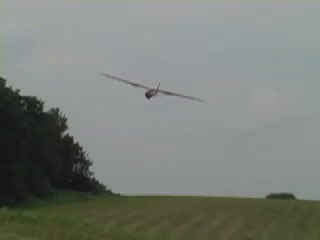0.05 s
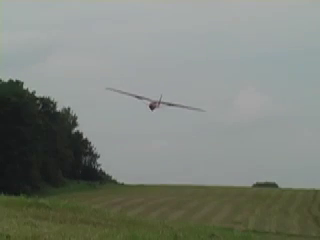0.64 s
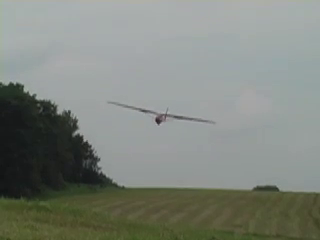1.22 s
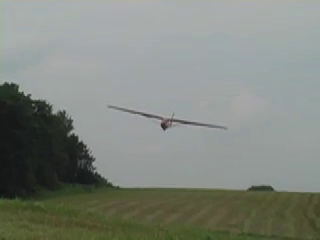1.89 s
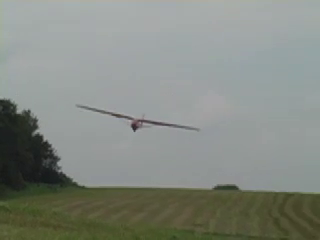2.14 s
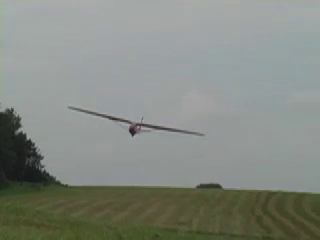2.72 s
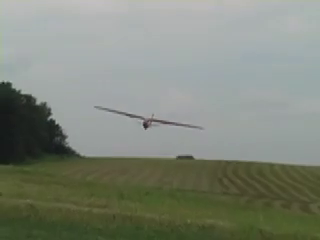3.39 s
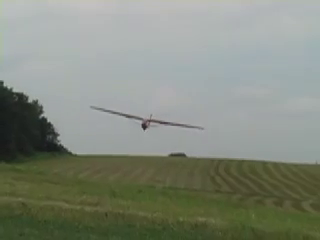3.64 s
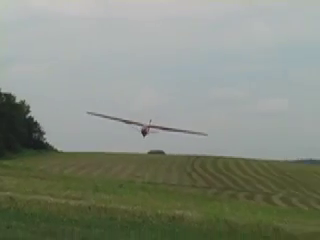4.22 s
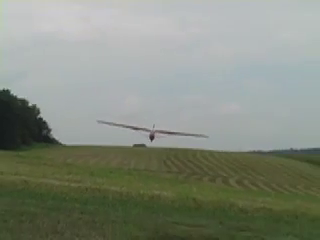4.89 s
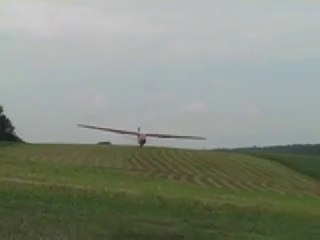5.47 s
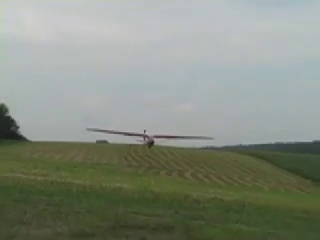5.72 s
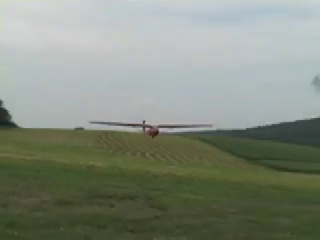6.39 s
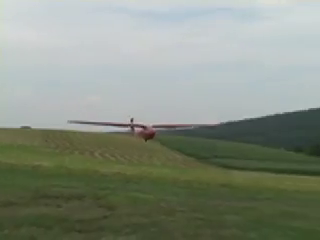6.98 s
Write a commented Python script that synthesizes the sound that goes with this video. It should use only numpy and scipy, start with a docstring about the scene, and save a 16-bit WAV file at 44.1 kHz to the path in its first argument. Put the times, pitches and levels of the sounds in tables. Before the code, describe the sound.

A glider's soft rush of air slowly grows over a distant engine's low hum, with breeze, a songbird and faint crickets.

```python
"""From the start, air rushes over the wings and struts of a low glider approaching a hand-held camcorder across
a mown field; a breeze blows, bush crickets rasp and a distant three-cylinder engine idles. From 0.3 s to 3.7 s
a songbird whistles paired notes in the trees on the right, while gusts buffet the microphone and the camera
takes two knocks, the first a hard one. At 4.3 s the engine picks up a little. Two more knocks follow near 6 s,
and the glider's rush ends louder and brighter than it began."""
import sys
import numpy as np
from scipy import signal
from scipy.fft import rfft, irfft
from scipy.io import wavfile
from scipy.ndimage import uniform_filter1d

SR = 44100
rng = np.random.default_rng(int(sys.argv[2]) if len(sys.argv) > 2 else 0)


def log_audio(samples):
    """Write samples as a 16-bit WAV file to the path given in sys.argv[1]."""
    # one column per channel
    frames = np.atleast_2d(samples).T
    # limit to full scale, then quantise
    limited = np.clip(frames, -1, 1)
    pcm = np.round(limited * 32767).astype(np.int16)
    wavfile.write(sys.argv[1], SR, pcm)


N = 308700
TIME = np.arange(N) / SR

# whine of the tape drive: (harmonic of the drum rate [1], rms level [dB])
DRUM_HARMONICS = [(16, -82), (17, -79.5), (18, -82), (19, -81), (34, -94), (36, -93), (37, -93), (38, -94)]

# spectra of the wind over the field, its hiss and the trees: (frequency [Hz], density level [dB])
WIND_SPECTRUM = [(30, -23), (200, -5.5), (450, 0.5), (800, -0.5), (1300, -7.5), (2000, -10.5),
                 (3200, -10.5), (5200, -9), (6600, -15), (9500, -18.5), (12000, -18.5), (15000, -23)]
HISS_SPECTRUM = [(1500, -20), (4000, -3), (8000, 1), (12000, -4), (15000, -22)]
TREE_SPECTRUM = [(300, -7), (550, 9), (800, -2), (1200, 4), (1800, -18)]
# swells of hiss, soughs in the trees and gusts on the microphone: (time [s], width [s], level [dB])
HISS_SWELLS = [(5.05, 0.11, -56.5), (5.16, .09, -56.8), (5.335, .11, -57.5)]
TREE_SWELLS = [(1.6, 1, -64), (6.85, 0.64, -59)]
GUST_SWELLS = [(.72, 0.44, -48), (1.35, 0.13, -48), (2.003, 1, -47), (2.547, 0.32, -53), (3.33, 0.39, -41)]
# spectra of gusts, grip, casing clicks and grass ticks: (frequency [Hz], density level [dB])
GUST_SPECTRUM = [(25, -51), (50, 1), (80, 5.5), (110, .5), (160, -22.5), (240, -15), (500, -65)]
GRIP_SPECTRUM = [(120, -22), (300, 4), (450, 8.5), (600, -2.5), (820, 0), (1300, -10.5), (3000, -30)]
CLICK_SPECTRUM = [(1000, -14), (3000, -6), (6000, 11), (10000, 6), (15000, -13)]
TICK_SPECTRUM = [(7000, -24), (9500, 10), (11000, -7), (14000, -20)]

# shifts of the hand on the grip: (time [s], width [s], level [dB])
GRIP_SWELLS = [(2.3, 0.065, -49), (3.39, 0.12, -53), (3.7, 0.35, -62), (4.45, 1, -61.5), (5.3, 0.28, -58.5),
               (5.87, 0.052, -52), (6.285, 0.088, -53), (6.95, 0.23, -57)]
# clicks of the casing and ticks in the grass: (time [s], t60 [s], level [dB])
CLICK_BURSTS = [(.348, .02, -58), (4.645, .02, -48.5), (4.656, .015, -50), (5.852, .012, -54),
                (6.26, .022, -48)]
TICK_BURSTS = [(1.361, .04, -61), (1.612, .04, -59), (1.824, .04, -65), (1.949, .04, -61),
               (2.072, .04, -63), (2.248, .03, -63), (2.46, .03, -65), (3.447, 0.033, -63)]
# knocks on the camera: (time [s], gain [dB], contact time [s])
IMPACTS = [(0.3491, -29, 0.0019), (3.412, -33.5, 0.004), (5.853, -35.5, 0.0025), (6.262, -38, 0.0027)]
# normal modes of the casing: (frequency [Hz], relative level [dB], t60 [s])
CASING_MODES = [(359, 0.5, 0.054), (445, 1, 0.031), (673, -2, 0.031), (770, -3.5, 0.041), (1850, -9, 0.016),
                (2300, 0, 0.0066), (2830, 1, 0.0073)]

# chorus of far crickets: (frequency [Hz], density level [dB])
CHORUS_SPECTRUM = [(6500, -34), (7300, -8.5), (7800, -3.5), (8200, -3.5), (8500, -6.5), (9200, -24)]
# near crickets: (stroke rate [Hz], sounding share of the cycle [1], crest pitch [Hz], pitch fall [Hz],
# rasp width [Hz], gain [dB], left minus right [dB])
NEAR_CRICKETS = [(21.3, .72, 8300, 550, 170, -68.3, -3), (20.0, .72, 8020, 900, 260, -67.3, 0),
                 (11.4, .25, 8100, 1150, 150, -66.5, -1)]

# notes of each named bird syllable:
# (offset [s], length [s], first pitch [Hz], middle pitch [Hz], last pitch [Hz], relative level [dB])
SYLLABLE_NOTES = { "slur": [(.015, .035, 4000, 3550, 3100, -8), (.06, .035, 6000, 6100, 6300, -2),
                  (.132, .05, 4750, 5100, 5150, 1), (.205, .066, 4000, 3770, 3750, -1)],
                  "dip": [(0, .032, 6800, 6150, 5800, -1), (.03, .036, 5800, 6080, 6080, -.5)],
                  "scoop": [(0, .05, 5200, 4350, 3950, 0)],
                  "twitter": [(.029 * k, .029, 3500, 5400, 3700, 0) for k in range(4)],
                  "fall": [(.005, .028, 3550, 3400, 3050, -5), (.066, .04, 3900, 4080, 4250, -2.5),
                  (.114, .074, 6500, 6100, 5050, .5)], "flick": [(0, .03, 5050, 4870, 4800, 0)],
                  "sweep": [(0, .062, 6800, 4350, 3100, -2), (.078, .022, 3200, 4100, 5100, -13),
                  (.1, .078, 5150, 5720, 5600, .5)], "seesaw": [(0, .044, 5050, 4780, 4700, -1),
                  (.05, .022, 5000, 6300, 7400, -6), (.125, .063, 3130, 3460, 3500, 1)],
                  "arch": [(.004, .036, 3300, 4450, 5900, -.5), (.038, .03, 5850, 6250, 5700, -1),
                  (.066, .03, 5300, 3900, 3200, -4.5)], "sigh": [(0, .095, 4400, 4030, 3450, 0)]}
# the song: (time [s], syllable [name], level [dB])
BIRD_SONG = [(.3, "slur", -61), (.676, "dip", -60.5), (.745, "twitter", -63), (.945, "scoop", -60),
             (.96, "dip", -55), (1.032, "twitter", -61.5), (1.242, "fall", -56), (1.425, "flick", -58),
             (1.532, "fall", -56.5), (1.708, "flick", -63), (1.875, "sweep", -52.5),
             (2.174, "sweep", -54.5), (2.488, "seesaw", -56), (2.788, "seesaw", -55.5),
             (3.138, "arch", -55.5), (3.324, "arch", -58.5), (3.595, "sigh", -62.5)]

# exhaust note, firing on every third order: (order of the working cycle [1], relative level [dB])
EXHAUST_ORDERS = [(2, -24), (3, 0), (4, -12.3), (5, -26), (6, -5.2), (7, -26), (8, -25), (9, -20),
                  (10, -28)]
# spectra of the engine's rumble and clatter: (frequency [Hz], density level [dB])
RUMBLE_SPECTRUM = [(20, -33), (35, -25), (50, 1.5), (80, 4), (115, 2), (160, 4), (230, -7), (400, -37)]
CLATTER_SPECTRUM = [(70, -5.5), (160, 1.5), (240, 0.5), (320, -3), (450, -13), (600, -21.5), (800, -16),
                    (1300, -16.5), (2200, -25.5)]
# slow drift of the clatter: (time [s], relative level [dB])
CLATTER_LEVELS = [(0, 1.5), (.7, 0.5), (1.4, 1.5), (2.8, 0.5), (4.4, 4), (5.4, 0), (6.5, 0), (7, 1)]

# spectrum of the glider's rush: (frequency [Hz], density level [dB])
RUSH_SPECTRUM = [(200, 1.5), (450, 1), (620, -3.5), (800, 0), (1000, -1), (1300, 2.5), (1700, -2),
                 (2100, 1), (3300, 0), (4600, -3.5), (5600, -5), (7000, -9), (9500, -16.5), (15000, -34)]
# surges and lulls of the rush in uneven air: (time [s], width [s], level change [dB])
RUSH_SURGES = [(1.7, 2.2, 3.5), (4.6, 0.37, 1), (5.316, 0.57, 2.5), (6.95, 1, -1.1)]
# treble of the rush, above 1900 Hz: (time [s], gain [dB])
RUSH_TREBLE = [(1, -10.5), (3.2, -2), (5.3, 1), (6, -1.2), (7, 3)]


def undb(db):
    """Amplitude ratio of a level: tenfold for every 20 dB."""
    return 10 ** (np.asarray(db) / 20)


def bell(time, width):
    """Gaussian envelope of peak 1, its width taken between the 1/e points."""
    return np.exp(-(2 * (TIME - time) / width) ** 2)


def swells(table):
    """Superposed Gaussian envelopes, one for each row."""
    return sum(undb(db) * bell(time, width) for time, width, db in table)


def bursts(table):
    """Sudden onsets with exponential decay, falling 60 dB in t60."""
    return sum((TIME >= time) * undb(db - 60 * np.abs(TIME - time) / t60) for time, t60, db in table)


def walk(rate_hz):
    """Low-pass random fluctuation with a standard deviation near 1."""
    step = max(int(SR / rate_hz), 1)
    held = np.repeat(rng.standard_normal(N // step + 1), step)
    return 1.2 * uniform_filter1d(uniform_filter1d(held, step), step)[:N]


def pan(left_db):
    """Channel gains for a level difference, left minus right."""
    return undb(np.array([[left_db], [-left_db]]) / 2)


def noise(spectrum, correlation):
    """Spectrally shaped noise of rms 1; the mid-to-side ratio sets the correlation of the channels."""
    hz, db = np.transpose(spectrum)
    octave = np.log2(np.fft.rfftfreq(N, 1 / SR) + 1)
    roll_off_db = 30 * np.maximum(octave - np.log2(hz[-1]), 0)
    gain = undb(np.interp(octave, np.log2(hz), db) - roll_off_db)
    mid, side = irfft(rfft(rng.standard_normal((2, N))) * gain, N)
    stereo = np.sqrt(1 + correlation) * mid + np.sqrt(1 - correlation) * np.array([side, -side])
    return stereo / stereo.std()


def scatter(direct, t60, wet_db):
    """Scattering by trees and ground adds a diffuse, decaying tail, independent on each side."""
    t = TIME[:SR // 2]
    tail = rng.standard_normal((2, len(t))) * undb(-60 * t / t60)
    tail /= np.sqrt(np.sum(tail ** 2, axis=1, keepdims=True))
    return direct + undb(wet_db) * signal.fftconvolve(direct[None], tail, axes=1)[:, :N]


def tape_drive(drum_hz=299.7):
    """Periodic rotation of the head drum gives a faint, slightly wavering line spectrum."""
    angle = 2 * np.pi * np.cumsum(drum_hz + .1 * walk(8)) / SR
    return sum(np.sqrt(2) * undb(db + 2 * walk(5)) * np.sin(k * angle) for k, db in DRUM_HARMONICS)


def breeze():
    """Turbulent flow over field and trees makes broadband noise, with soughs and brief swells of hiss."""
    wind = noise(WIND_SPECTRUM, correlation=.041) * undb(-56.5 + .5 * walk(1.6) + .5 * walk(7.4))
    hiss = noise(HISS_SPECTRUM, correlation=0) * swells(HISS_SWELLS)
    trees = noise(TREE_SPECTRUM, correlation=.61) * swells(TREE_SWELLS)
    return wind * pan(.16) + hiss + trees


def buffets():
    """The eddy in each gust imposes a coherent low-frequency pressure on both microphone ports."""
    return noise(GUST_SPECTRUM, correlation=1) * swells(GUST_SWELLS) * pan(2.5)


def grip():
    """Friction of skin and strap travels through the casing as dull structure-borne sound."""
    return noise(GRIP_SPECTRUM, correlation=.38) * swells(GRIP_SWELLS) * pan(2.2)


def clicks():
    """Damped transients: the plastic casing clicks under the fingers; something ticks in the grass."""
    plastic = noise(CLICK_SPECTRUM, correlation=.5) * bursts(CLICK_BURSTS)
    grass = noise(TICK_SPECTRUM, correlation=.76) * bursts(TICK_BURSTS)
    return plastic + grass


def knocks():
    """A fingertip's impact excites the casing's damped modes, which rock the two ports out of step."""
    out, t = np.zeros((2, N)), TIME[:SR // 6]
    port_phase = np.array([[0], [-1.5]])
    ring = sum(undb(db - 60 * t / t60) * np.sin(2 * np.pi * hz * t + port_phase)
               for hz, db, t60 in CASING_MODES)
    for time, db, contact_s in IMPACTS:
        start = int(time * SR)
        attack = 1 - np.exp(-t / contact_s)  # a softer touch builds up more slowly
        out[:, start:start + len(t)] += undb(db) * ring * attack
    return out * pan(1.4)


def cricket(strokes_hz, share, crest_hz, fall_hz, width_hz, db, left_db):
    """Stridulation: each wing stroke drags a scraper over a file, then the wings reopen silently."""
    cycle = np.cumsum(strokes_hz * (1 + .035 * walk(2) + .13 * walk(20))) / SR % 1
    stroke = np.minimum(cycle / share, 1)
    crest = .35  # fraction of the stroke at which the pitch peaks
    hz = crest_hz - fall_hz * ((stroke - crest) / (1 - crest)) ** 2 + 85 * walk(17)
    roughness = walk(width_hz) + 1j * walk(width_hz)
    rasp = np.real(roughness * np.exp(2j * np.pi * np.cumsum(hz) / SR))
    envelope = np.sin(np.pi * stroke) * undb(db + walk(1) + 1.8 * walk(11))
    return scatter(rasp * envelope, t60=.18, wet_db=-8) * pan(left_db)


def insects():
    """Far crickets sum incoherently to a noise band behind three near ones; all swell around 4.4 s."""
    far = noise(CHORUS_SPECTRUM, correlation=.018) * undb(-64.5) * pan(-1.6)
    near = sum(cricket(*row) for row in NEAR_CRICKETS)
    return (near + far) * undb(-.4 + 1.7 * bell(4.4, 2.7))


def bird(pitch_waver=.0037):
    """Frequency modulation: each note is a tone on a parabolic glide, scattered by the wood's edge."""
    hz, gain = np.zeros(N), np.zeros(N)
    for time, syllable, db in BIRD_SONG:
        for offset, length, first_hz, middle_hz, last_hz, note_db in SYLLABLE_NOTES[syllable]:
            span = int((time + offset) * SR) + np.arange(int(length * SR))
            glide = np.polyfit([0, .5, 1], [first_hz, middle_hz, last_hz], 2)
            hz[span] = np.polyval(glide, np.linspace(0, 1, len(span)))
            gain[span] = undb(db + note_db) * signal.windows.tukey(len(span), .3)
    gain *= undb(2.3 * walk(240))
    phase = 2 * np.pi * np.cumsum(hz * (1 + pitch_waver * walk(300))) / SR
    left, right = scatter(gain * np.sin(phase), t60=.35, wet_db=-11)
    # from the right, the song reaches the left port later and weaker
    return np.array([np.interp(TIME - .000065, TIME, left), right]) * pan(-8)


def engine(idle_hz=63.8, fast_hz=74.3, throttle_s=4.34, spin_up_s=.82):
    """Periodic firing gives harmonics; only low ones carry this far. Note and clatter grow with speed."""
    firing_hz = fast_hz + (idle_hz - fast_hz) * np.exp(-np.maximum(TIME - throttle_s, 0) / spin_up_s)
    speed_db = 20 * np.log10(firing_hz / idle_hz)
    cycle_phase = 2 * np.pi * np.cumsum(firing_hz) / SR / 3 + .012 * walk(25)  # three firings a cycle
    # each firing is a dip of pressure, smeared a little by the silencer
    note = -np.sqrt(2) * sum(undb(db) * np.cos(k * cycle_phase + (k / 6) ** 2)
                             for k, db in EXHAUST_ORDERS)
    note *= undb(-40.5 + 2.1 * speed_db + .18 * walk(10))
    rumble = noise(RUMBLE_SPECTRUM, correlation=.59) * undb(-48.5 + walk(8.5))
    drift_db = np.interp(TIME, *np.transpose(CLATTER_LEVELS))
    clatter = noise(CLATTER_SPECTRUM, correlation=.76)
    clatter *= undb(-53.5 + 5.5 * speed_db + drift_db + 1.4 * walk(9))
    # from the left, the clatter reaches the right port later
    clatter[1] = np.interp(TIME - .00022, TIME, clatter[1])
    return (note + rumble) * pan(4.3) + clatter * pan(3.4)


def glider(start_m=179, speed_m_s=12.15):
    """Turbulence noise from straight ahead grows by the inverse-distance law; the ground reflects it."""
    distance_m = start_m - speed_m_s * TIME
    approach_db = 20 * np.log10(start_m / distance_m)
    opening_db = np.tanh((TIME - .9) / .087) - 1  # 2 dB fainter until about 0.9 s
    surge_db = sum(db * bell(time, width) for time, width, db in RUSH_SURGES)
    direct = noise(RUSH_SPECTRUM, correlation=1) * undb(.5 * walk(14) + .12 * walk(2.82))
    # the detour over the ground shortens as the glider sinks
    lag_s = np.interp(TIME, [0, N / SR], [.0026, .0014]) * (1 + .032 * walk(2.23))
    reflected = np.array([np.interp(TIME - lag_s, TIME, side) for side in direct])
    rush = direct + .047 * reflected
    # distance absorbs the treble, so the rush brightens as it nears
    body = signal.sosfiltfilt(signal.butter(2, 1900, fs=SR, output="sos"), rush)
    treble = (rush - body) * undb(np.interp(TIME, *np.transpose(RUSH_TREBLE)))
    return (body + treble) * undb(-58 + approach_db + opening_db + surge_db)


def scene():
    """Superposition: the pressures of all sources add at the two microphone ports."""
    outdoors = glider() + breeze() + buffets() + engine() + bird() + insects()
    return outdoors + knocks() + clicks() + grip() + tape_drive()


def record(dry, cutoff_hz=15350):
    """Band limiting: the camcorder's steep low-pass filter removes the highest treble."""
    return signal.sosfilt(signal.ellip(10, .2, 70, cutoff_hz, fs=SR, output="sos"), dry)


dry = scene()
out = record(dry)
log_audio(out)
```